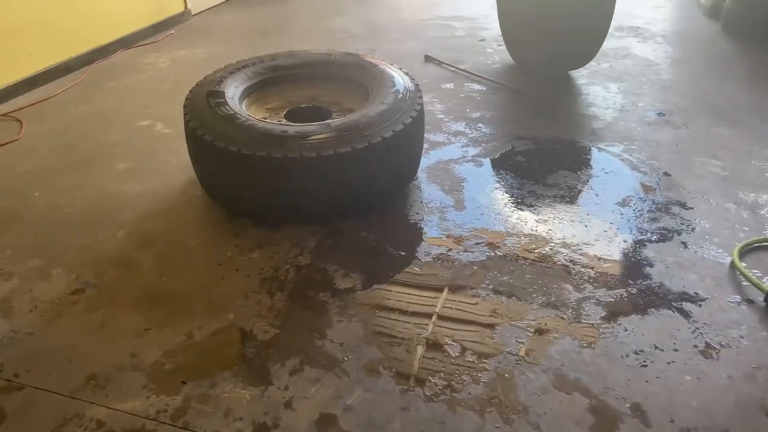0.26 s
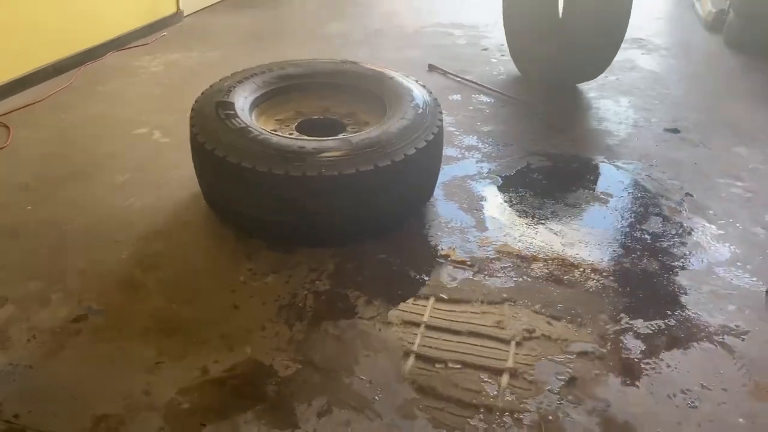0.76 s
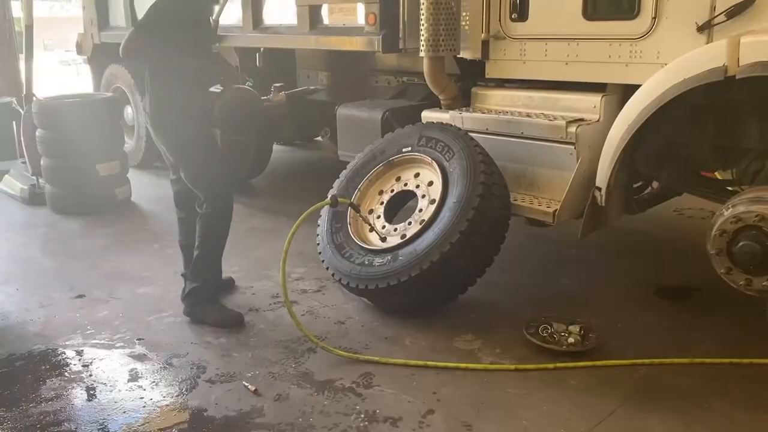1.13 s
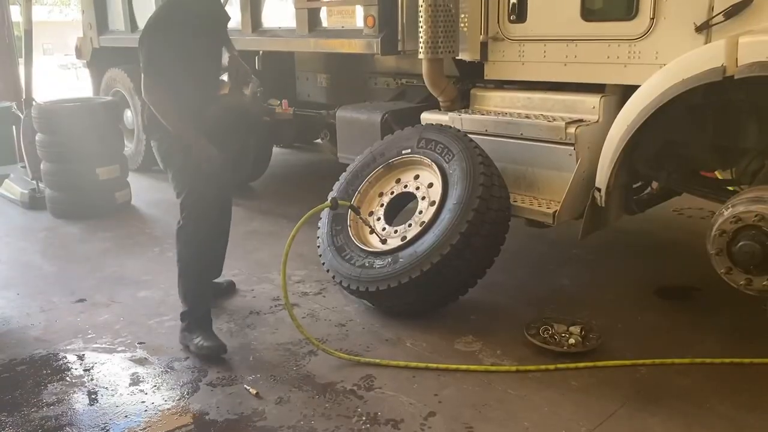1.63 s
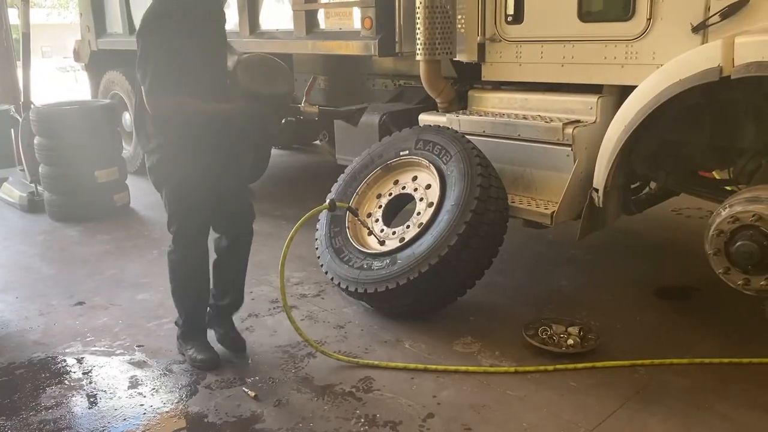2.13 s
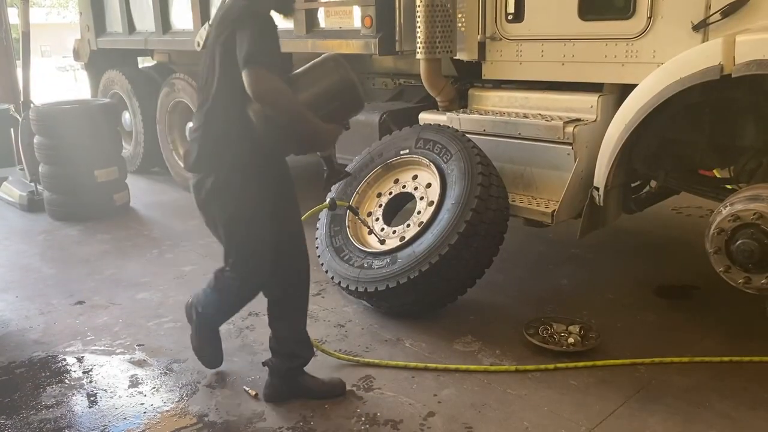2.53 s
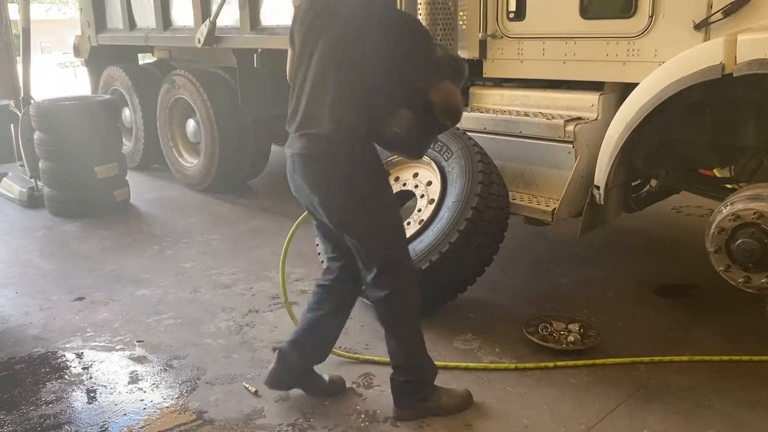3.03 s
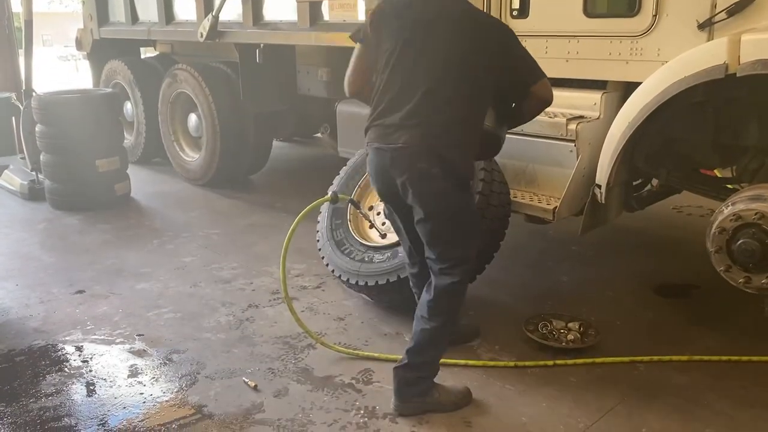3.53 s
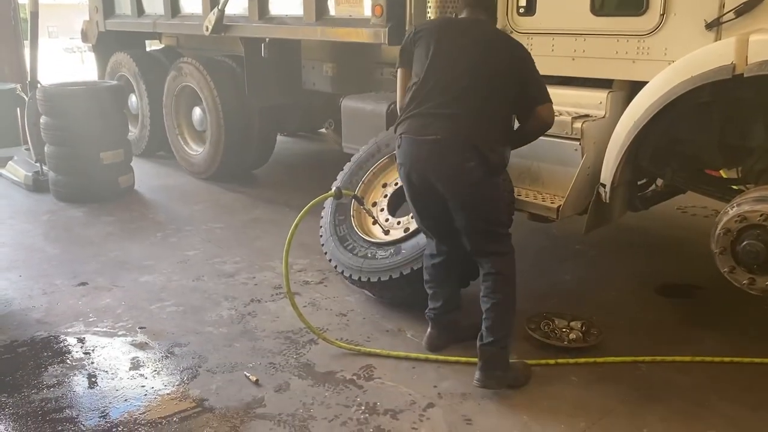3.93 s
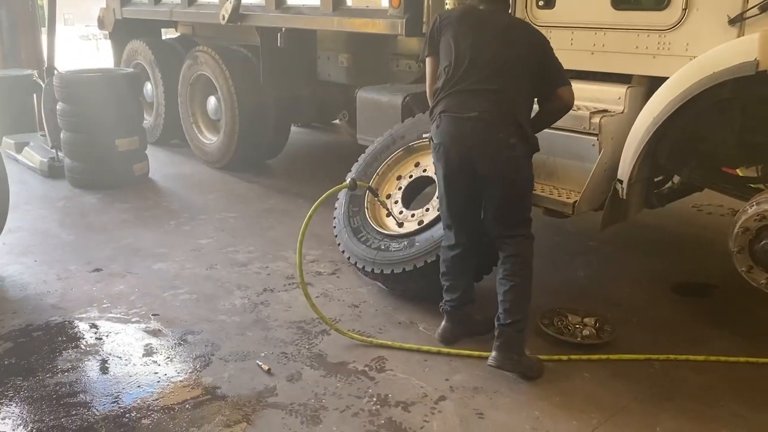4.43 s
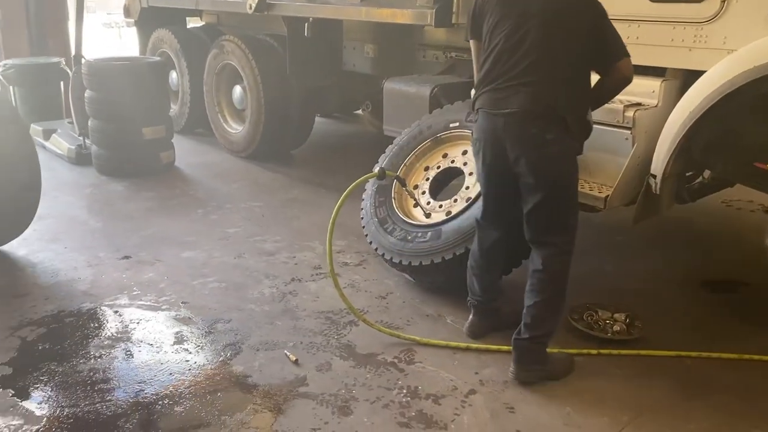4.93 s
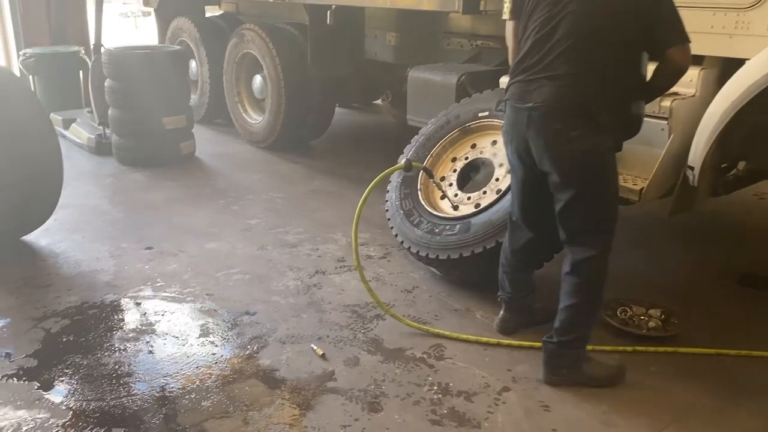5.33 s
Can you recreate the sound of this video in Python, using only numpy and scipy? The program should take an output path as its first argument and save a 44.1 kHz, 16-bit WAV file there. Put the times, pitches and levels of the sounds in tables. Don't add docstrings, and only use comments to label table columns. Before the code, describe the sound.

In an open workshop bay, a dull distant hiss of fans and air lines jumps abruptly to a loud, bright, steady air leak close by a truck tire. Draughts rumble and slap the stereo microphone. Near the end a nozzle rattles on the metal rim, a sharp air blast bursts out, the wheel rings briefly, and the leak chokes off into near quiet.

```python
import sys
import numpy as np
from scipy import signal
from scipy.fft import rfft, irfft, next_fast_len
from scipy.io import wavfile
from scipy.ndimage import uniform_filter1d

SR = 44100
rng = np.random.default_rng(int(sys.argv[2]) if len(sys.argv) > 2 else 0)


def wav_record(signal):
    frames = np.transpose(np.atleast_2d(signal))
    bounded = np.clip(frames, -1, 1)
    quanta = np.round(bounded * 32767).astype(np.int16)
    wavfile.write(sys.argv[1], SR, quanta)


def gain_from_db(level_db):
    decades = np.asarray(level_db, float) / 20
    return 10 ** decades


N = 245637
CLOSE_UP_S = .952


def rms_one(x):
    return x / np.sqrt(np.mean(x ** 2) + 1e-20)


def in_time(rows):
    s, db = np.transpose(rows)
    return gain_from_db(np.interp(np.arange(N) / SR, s, db, left=-140))


def at_hz(points, hz):
    table_hz, value = np.transpose(points)
    return np.interp(np.log(hz + 1), np.log(table_hz), value)


def drift(rate_hz):
    r = np.exp(-2 * np.pi * rate_hz / SR)
    noise = rng.standard_normal(N + SR)
    return rms_one(signal.lfilter([1], [1, -2 * r, r * r], noise)[SR:])


def swells(rows):
    start, db, attack, hold, fall = np.transpose(rows)[:, :, None]
    age = np.arange(N) / SR - start
    rise = np.sin(np.pi / 2 * np.clip(age / attack, 0, 1)) ** 2
    fallen_db = fall * np.maximum(age - attack - hold, 0)
    return np.sqrt(np.sum((rise * gain_from_db(db - fallen_db)) ** 2, axis=0))


def air(colour, peaks=(), floor_db=0, lag_turns=0, focus=1):
    # f/Hz, likeness/0..1
    likeness = [(60, .8), (200, .68), (700, .3), (2000, .55), (3000, .63), (4000, .6), (5500, .4),
                (6300, .5), (7000, .96), (8500, .99), (15000, .99)]
    size = next_fast_len(N)
    hz = np.fft.rfftfreq(size, 1 / SR)
    in_band = (hz > colour[0][0] / 2) * (hz < 1.02 * colour[-1][0])
    power = gain_from_db(2 * (at_hz(colour, hz) + floor_db)) * in_band
    for centre_hz, width_hz, top_db in peaks:
        height = gain_from_db(2 * (top_db + 18.5)) * gain_from_db(2 * at_hz(colour, centre_hz))
        power = power + height / (1 + (2 * (hz - centre_hz) / width_hz) ** 2) ** 2
    ripple = rms_one(uniform_filter1d(rng.standard_normal(len(hz)), 150))
    power = power * gain_from_db(2 * 2.5 * (hz > 600) * ripple)
    alike = np.clip(at_hz(likeness, hz), 0, 1) ** focus
    mid, side = rfft(rng.standard_normal((2, size)))
    pair = np.sqrt(1 + alike) * mid + np.sqrt(1 - alike) * side * [[1], [-1]]
    pair[1] *= np.exp(-2j * np.pi * lag_turns * np.minimum(hz / 6600, 1))
    return rms_one(irfft(pair * np.sqrt(power), size)[:, :N])


def blast():
    # t/s, peak/dB, attack/s, hold/s, fall/(dB/s)
    jet = [
        (4.469, -11.5, 0.0091, 0.022, 259),
        (4.53, -18, 0.025, 0.0044, 165),
    ]
    wash = [
        (4.474, -20.5, .05, 0.011, 50.6),
        (4.74, -33.5, 0.11, .16, 68),
        (5.2, -55.5, .1, .02, 25),
    ]
    song = [(4.47, -39, .008, .02, 100), (4.51, -25.5, 0.059, .005, 150), (4.73, -46.5, 0.06, 0.28, 65),
            (5.2, -60, .05, .07, 42)]
    # f/Hz, level/dB per Hz
    jet_colour = [(200, -28), (400, -10.5), (700, -3.5), (1000, -7), (1500, -3), (2200, 0), (3000, 3),
                  (4000, -1), (5500, -0.5), (7000, -2), (8500, -7.5), (11000, -7), (15000, -15)]
    # f/Hz, width/Hz, level/dB
    nozzle = [(966, 110, -10), (2210, 180, -16.5), (2780, 110, -28), (3620, 110, -26), (5850, 73, -12),
              (6240, 80, -9), (6560, 180, -11)]
    # f/Hz, level/dB per Hz
    wash_colour = [(300, -22), (600, -25), (930, -20), (1080, -5), (1500, -3), (2200, 0), (3200, -2),
                   (4500, 0.5), (6000, 0), (7500, -6.5), (9000, -8.5), (12000, -17.5), (13500, -23),
                   (15500, -64.5)]
    # f/Hz, width/Hz, level/dB
    wheel = [(814, 36, -15), (1100, 110, 0.5), (1216, 48, 5), (2108, 31, -6), (2330, 30, -4),
             (2740, 43, -5), (4709, 44, 0)]
    torn = air(jet_colour, nozzle, focus=0.4) * gain_from_db(1.5 * drift(130))
    sung = air([(300, 0), (9000, 0)], wheel, floor_db=-27)
    return swells(jet) * torn + swells(wash) * air(wash_colour, focus=3.3) + swells(song) * sung


def ring(clicks, hz, t60):
    r, w = gain_from_db(-60 / (t60 * SR)), 2 * np.pi * hz / SR
    return signal.lfilter([0, np.sin(w)], [1, -2 * r * np.cos(w), r * r], clicks)


def knocks():
    # t/s, peak/dB, f/Hz, t60/s
    rings = [(4.472, -12, 3620, 0.091), (4.475, -13, 2780, 0.058), (4.476, -9, 5400, 0.028),
             (4.482, -38, 778, .02), (4.48, -17, 3780, 0.14), (4.515, -23, 814, 0.11),
             (4.521, -22, 4709, 0.16), (4.548, -22, 2108, 0.12), (4.554, -12, 1235, 0.092),
             (4.555, -30, 254, 0.056), (4.588, -20.5, 1100, 0.039), (4.618, -39, 746, 0.022),
             (4.755, -36.5, 1232, 0.29), (4.86, -43.5, 1233, 0.51)]
    # t/s, level/dB
    taps = [(3.89, -0.5), (3.897, -2), (3.909, -6), (3.937, -11), (3.962, -13), (4.006, -16)]
    # f/Hz, level/dB, t60/s
    tap_rings = [(1940, -24.5, 0.039), (2360, -26.5, 0.023), (3030, -27, 0.017), (3570, -29, .01),
                 (1000, -35, .01), (1560, -35, .012)]
    # t/s, level/dB
    cracks = [(.358, -33.5), (.404, -37), (1.438, -21.5), (1.452, -33), (1.478, -31)]
    # f/Hz, level/dB, t60/s
    crack_rings = [(800, 0.5, .015), (1240, -4.5, .01), (2020, -9, .008), (3270, -6, 0.007)]
    blows = list(rings)
    for hits, modes in (taps, tap_rings), (cracks, crack_rings):
        blows += [(s, db + mode_db, hz, t60) for s, db in hits for hz, mode_db, t60 in modes]
    out, age = np.zeros(N), np.arange(9000) / SR
    for s, peak_db, hz, t60 in blows:
        swell_s = max(.13 * t60, 0.0017)
        push = np.sin(np.pi * np.minimum(age / swell_s, 1)) ** 2 * np.sin(2 * np.pi * hz * age)
        rung, at = ring(push, hz, t60), round(s * SR)
        out[at:at + 9000] += gain_from_db(peak_db) * rung / np.abs(rung).max()
    return np.array([out, gain_from_db(1.0) * np.roll(out, 2)])


def leak():
    # t/s, level/dB
    level = [
        (0.9515, -70),
        (0.953, -23),
        (2.5, -23),
        (3.05, -23.5),
        (3.45, -25),
        (4.6, -25),
        (4.66, -34),
        (4.7, -36),
        (4.8, -84),
    ]
    # f/Hz, level/dB per Hz
    leak_colour = [(600, -20.5), (1000, -15), (1400, -14), (2000, -10), (3000, -8), (4500, -2.5), (6000, 0),
                   (6800, -0.5), (7600, 1), (9000, -1.5), (10200, 1.5), (11300, -0.5), (13000, 0),
                   (15600, -4.5)]
    # f/Hz, width/Hz, level/dB
    whistles = [(3840, 120, -19), (5400, 480, -25.5), (6340, 99, -12.5), (6800, 94, -9.5), (6900, 250, -32),
                (10390, 400, -43), (11600, 480, -21.5)]
    flutter_db = 0.46 * drift(7.6) + 0.43 * drift(200)
    return in_time(level) * air(leak_colour, whistles) * gain_from_db(flutter_db)


def gusts():
    # t/s, rumble/dB, buffeting/dB, 10 dB rise/s, 10 dB fall/s
    far_gusts = [(.11, -39, -37, 0.1, 0.26), (.37, -33, -34.5, 0.2, 0.24), (.63, -38.5, -41.5, .12, 0.24),
                 (0.801, -34.5, -35.5, 0.18, 0.07), (.935, -35.5, -36.5, 0.06, 0.06)]
    # t/s, rumble/dB, buffeting/dB, 10 dB rise/s, 10 dB fall/s
    near_gusts = [(1.017, -35, -27, .02, 0.031), (1.19, -36, -39, 0.097, 0.16),
                  (1.325, -41, -38.5, .015, .03), (1.445, -31, -30.5, 0.044, 0.14),
                  (1.63, -40, -45.5, .03, 0.044), (1.81, -40, -43.5, 0.04, .08),
                  (1.939, -33.5, -32, 0.047, 0.056), (2.07, -40, -44, 0.07, .12),
                  (2.24, -42.5, -52.5, 0.095, 0.098), (2.445, -31, -28.5, 0.054, 0.021),
                  (2.541, -36, -32, 0.01, 0.033), (2.645, -40, -41, 0.018, 0.04),
                  (2.75, -39.5, -45.5, 0.04, .07), (2.848, -32, -29.5, 0.027, 0.08),
                  (3.04, -37, -31.5, 0.043, 0.074), (3.23, -44, -46, 0.056, 0.35),
                  (3.32, -40, -50, 0.06, 0.063), (3.475, -42, -41.5, 0.019, 0.056),
                  (3.81, -37, -36.5, 0.053, 0.14), (3.97, -37, -38, 0.1, 0.022),
                  (4.05, -43.5, -51.5, .06, .08), (4.356, -32, -32.5, 0.09, 0.05),
                  (4.561, -36.5, -26.5, .045, 0.038), (4.93, -52.5, -52, 0.14, 0.1)]
    s, rumble_db, buffet_db, rise, fall = np.transpose(far_gusts + near_gusts)[:, :, None]
    t, out = np.arange(0, N + 64, 64) / SR, []
    hush_db = -20 * (t > 4.62)
    far_db = 12.5 * (t < CLOSE_UP_S) * np.minimum(t / .25, 1)
    # peak/dB, calm/dB, lag/s, share of the gust's length
    for db, calm_db, lag, share in (rumble_db, -54, 0.0093, 1.2), (buffet_db, -61, 0, .68):
        age = t - s - lag
        gust_db = np.max(db - 10 * np.where(age < 0, -age / rise, age / fall) / share, axis=0)
        floor_db = calm_db + hush_db + far_db * share
        out.append(np.interp(np.arange(N) / SR, t, gain_from_db(np.maximum(gust_db, floor_db))))
    return out


def eddies():
    # t/s, peak/dB, f/Hz, left-right/dB
    slaps = [(.078, -31, 175, 12), (.301, -36, 170, -3), (.356, -25, 210, 20), (.404, -26, 179, 12),
             (.629, -28, 252, 4), (.799, -25, 196, -1), (.922, -27, 300, 13), (1.008, -21, 174, -7),
             (1.16, -30, 276, 2.5), (1.318, -26, 420, 1), (1.354, -31, 272, 2), (1.414, -19, 375, 1),
             (1.438, -14.5, 513, 13), (1.623, -31, 184, 8), (1.934, -12.5, 194, 3), (2.443, -19, 340, 0),
             (2.536, -24, 395, -1), (2.64, -31, 274, -3), (2.841, -18.5, 190, 3), (2.889, -19.5, 171, 5),
             (3.011, -20.5, 170, 2.5), (3.037, -31, 170, 1.5), (3.063, -29, 257, 6), (3.135, -31.5, 318, 1),
             (3.216, -33, 343, 3), (3.468, -32, 227, 2), (3.794, -23, 213, 2.5), (3.954, -27, 175, 3),
             (4.526, -14, 800, -11), (4.546, -20, 189, -10)]
    # t/s, peak/dB, f/Hz
    thumps = [(0.283, -30, 96.9), (0.408, -26.5, 88.8), (0.544, -34, 65.4), (0.793, -27, 75.4),
              (1.01, -25.5, 115), (1.191, -29, 80), (1.357, -25.5, 72.7), (1.481, -21.5, 102),
              (1.932, -26.5, 64.6), (2.224, -32.5, 64.6), (2.543, -31, 86.1), (2.773, -26.5, 67.3),
              (3.67, -36.5, 113), (3.814, -28, 72.7), (3.844, -32, 64.6), (3.961, -36, 88.8),
              (4.301, -29, 99.6), (4.324, -22.5, 83.4), (4.399, -30.5, 70.0), (4.764, -54, 99.6)]
    rows = slaps + [(s, db + 5.5, hz, 1) for s, db, hz in thumps]
    buffet_db = 20 * np.log10(gusts()[1])
    for u, v, w in rng.random((60, 3)):
        at = u * (N - 4000)
        rows.append((at / SR, buffet_db[int(at)] + 7.5, 170 * 2 ** (0.9 * v * v), 8.0 * w - 2.5))
    out, chance = np.zeros((2, N)), rng.standard_normal((len(rows), 4003))
    for (s, peak_db, hz, pan_db), draw in zip(rows, chance):
        cycles = np.arange(4000) / SR * hz
        span, rough = (0.97, 0.18) if hz < 130 else (.8, .4)
        shape = cycles / span * np.exp(1 - cycles / span)
        phase = 3 * draw[0] + .5 * draw[1:3, None]
        band = signal.butter(2, [1.26 * hz, 3.1 * hz], "band", fs=SR, output="sos")
        edge = rms_one(signal.sosfilt(band, draw[3:]))
        wave = (np.sin(2 * np.pi * cycles + phase) + rough * edge * shape) * shape
        at = round(s * SR)
        out[:, at:at + 4000] += gain_from_db(peak_db - 7.5) * wave * gain_from_db([[pan_db / 2], [-pan_db / 2]])
    return out


def draught():
    rumble, buffet = gusts()
    deep = air([(30, -19), (55, 2), (100, -1), (150, -7.5), (300, -63), (1000, -90)])
    deep = deep * gain_from_db(2.2 * drift(31))
    fast = air([(100, -13.5), (180, -4), (320, -6.5), (600, -15.5), (1100, -37.5), (2500, -61), (6000, -100)])
    fast = fast * gain_from_db(3.47 * drift(45))
    far = np.arange(N) < CLOSE_UP_S * SR
    for lumps in deep, fast:
        lumps[1] = np.where(far, gain_from_db(-1.0) * np.roll(lumps[1], 700), lumps[1])
    return rumble * rms_one(deep) + buffet * rms_one(fast) * gain_from_db([[1.2], [-1.2]])


def murmur():
    # t/s, level/dB
    bay = [(0, -45.5), (0.5, -43.5), (0.95, -46), (2.5, -60), (4.46, -51.5), (4.6, -78), (5.0, -56),
           (5.57, -58)]
    # f/Hz, level/dB per Hz
    bay_colour = [(40, -11), (150, -13), (600, -8.5), (1000, -4.5), (1200, -12), (1600, -10), (2400, -8),
                  (3200, -14), (4500, -15), (5500, -21.5), (6500, -23.5), (8500, -35.5), (11000, -40),
                  (14300, -52), (15100, -58)]
    return in_time(bay) * air(bay_colour, lag_turns=3, focus=7)


def scene():
    return blast() + knocks() + leak() + eddies() + draught() + murmur()


def top_cut(x):
    return signal.sosfilt(signal.butter(12, 17080, fs=SR, output="sos"), x)


def record(dry):
    size = next_fast_len(N + 512)
    hz = np.fft.rfftfreq(size, 1 / SR)
    turn = np.pi * np.maximum(hz - 7000, 0) / 4120
    turn = turn - .14 * np.sin(4 * turn)
    rounded = .92 * np.tanh(dry / .92)
    spectrum = rfft(rounded, size) * np.exp(1j * turn * [[-1], [1]]) * (hz < 15690)
    ports = irfft(spectrum, size)[:, :N]
    return top_cut(ports)


dry = scene()
out = record(dry)
wav_record(out)
```